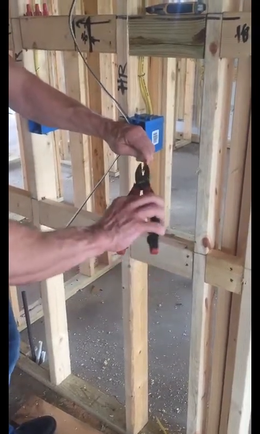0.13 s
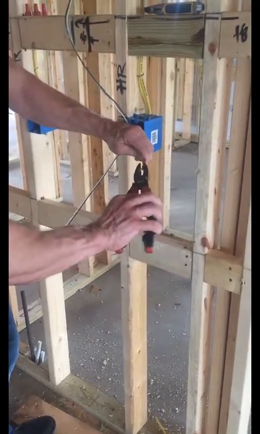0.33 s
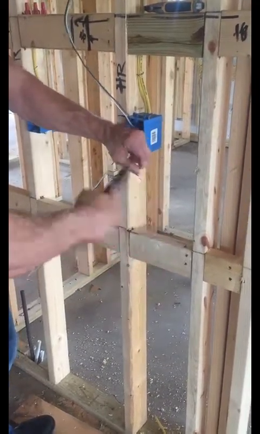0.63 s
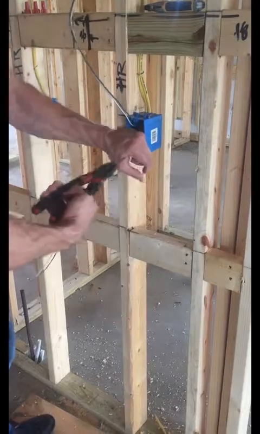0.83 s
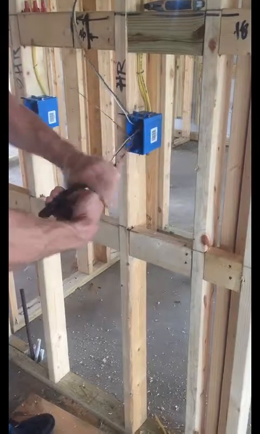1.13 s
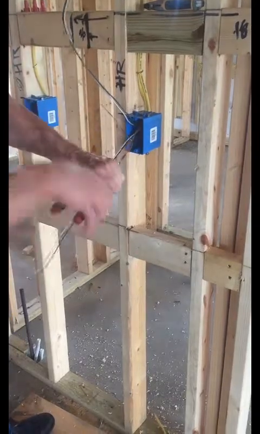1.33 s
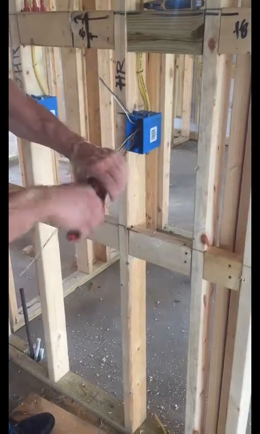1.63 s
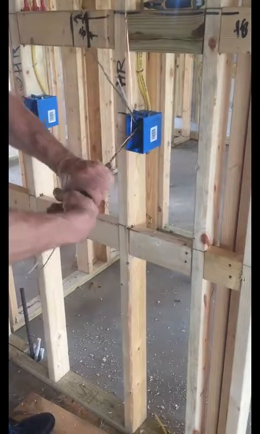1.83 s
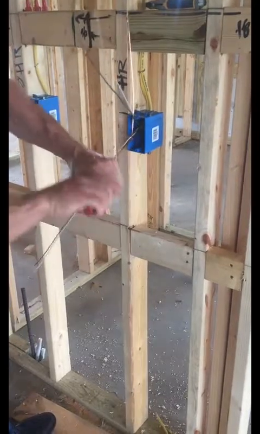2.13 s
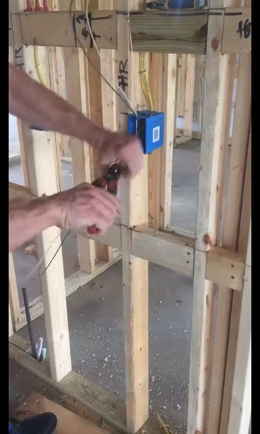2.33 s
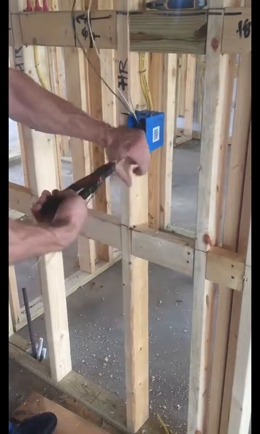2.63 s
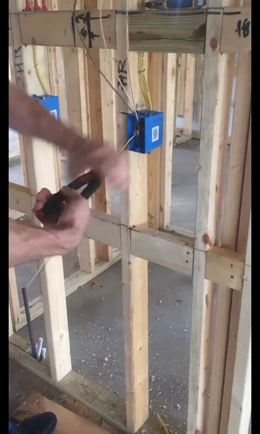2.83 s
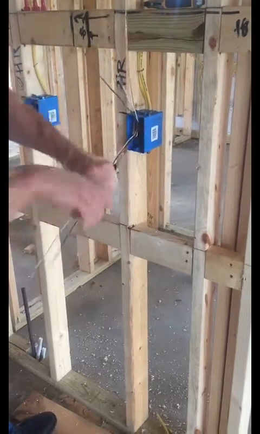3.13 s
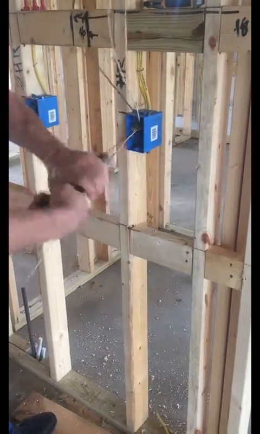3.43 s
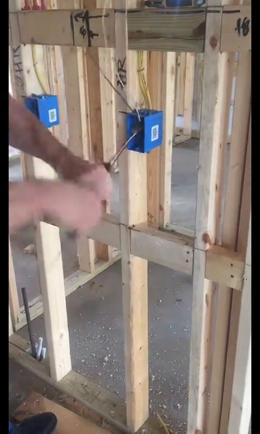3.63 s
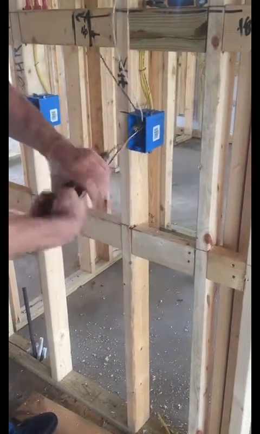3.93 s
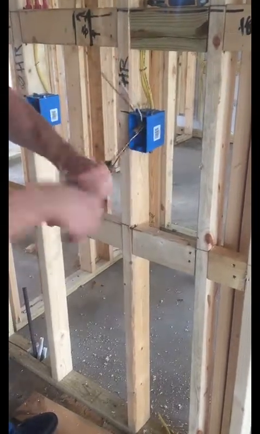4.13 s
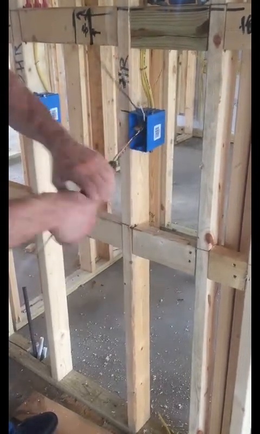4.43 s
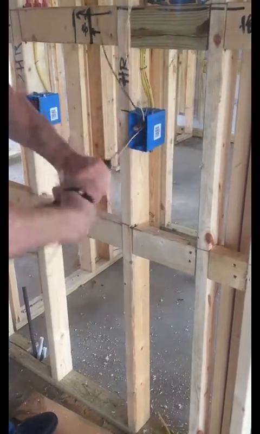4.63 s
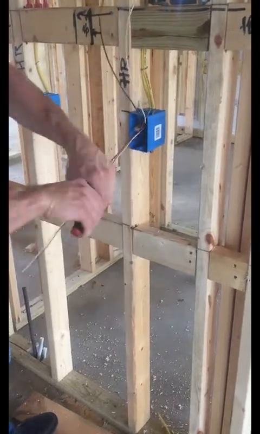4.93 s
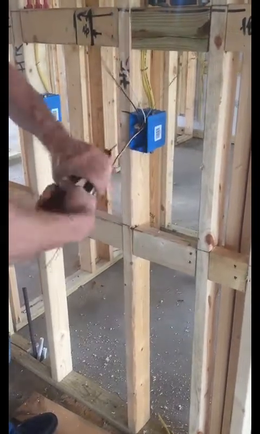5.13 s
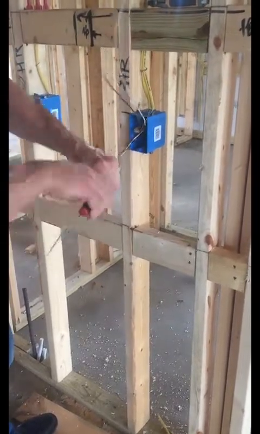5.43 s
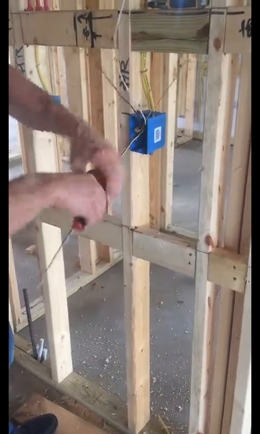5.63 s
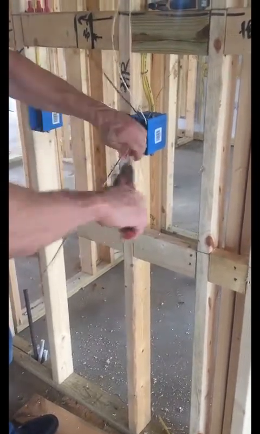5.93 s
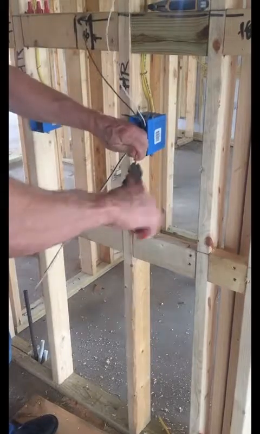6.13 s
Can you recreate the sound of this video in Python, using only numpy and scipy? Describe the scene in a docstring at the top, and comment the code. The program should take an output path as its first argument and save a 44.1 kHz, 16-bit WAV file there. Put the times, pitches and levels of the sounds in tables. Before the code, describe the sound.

Close metalwork in an unfinished wooden building: small clacks of plier jaws, gritty drags along wire, tiny squeaks and ticks, and one sharp twang-like slip after two seconds. Regripping knocks follow unevenly, with a few softer snaps and faint woody jolts from the frame. The last second is mostly quiet hiss, rumble and soft arm movement, picked up by a plain handheld microphone.

```python
"""Pliers twisting copper wires

Pliers twist bare copper wires at a wall box in a timber-framed, unfinished building.
Knocks, snaps and the box are dying tones; scrapes are dense random clicks that also ring the steel.
Wires tick and squeak, and studs, a room tail and a far wall throw sounds back.
Shaped noise makes the jolted framing, rumble, moving arms and a slowly sinking microphone hiss.
"""
import sys
import numpy as np
from scipy import signal
from scipy.fft import rfft, irfft
from scipy.io import wavfile
from scipy.ndimage import uniform_filter1d

SR = 44100
rng = np.random.default_rng(int(sys.argv[2]) if len(sys.argv) > 2 else 0)


def unload_audio(sound):
    """Save the sound as a 16-bit wav file, at the path given as the first command line argument."""
    columns = np.transpose(np.atleast_2d(sound))
    # keep every value between -1 and 1, then stretch to whole-number steps
    steps = np.round(np.clip(columns, -1, 1) * 32767)
    wavfile.write(sys.argv[1], SR, steps.astype(np.int16))


N = 276815  # length in samples

# Levels in the tables come before the trims set in the functions.
# Light knocks of the jaws on the wires:
# (time [s], level [dB], level of the upper modes [dB], favoured lower mode [Hz])
KNOCKS = [(.030, -42.5, -56, 950), (.445, -57.5, -68, 1020), (0.894, -62, -54, 1280),
          (1.238, -53, -57, 1290), (1.339, -43.5, -53, 1290), (1.39, -43, -56, 990),
          (1.454, -47.5, -52, 1010), (1.48, -52, -61, 1010), (1.566, -48, -78, 966),
          (2.099, -43, -52, 1300), (2.136, -44.5, -58, 1010), (2.236, -37, -43.5, 1290),
          (2.3, -48.5, -70, 990), (2.806, -41, -54, 1470), (2.841, -50, -41.5, 1280),
          (3.092, -40, -47, 1290), (3.295, -37.5, -56, 1270), (3.435, -49.5, -50, 1290),
          (3.481, -49, -64, 1290), (3.641, -37.5, -47, 1360), (3.748, -38.5, -44, 1310),
          (4.005, -59, -61, 1030), (4.152, -33.5, -38, 1265), (4.277, -44, -48, 1280),
          (4.604, -45, -55, 1270), (4.699, -39, -47.5, 1290), (5.316, -56.5, -48, 1020),
          (5.343, -48.5, -67, 1290), (5.58, -60, -55, 1400)]
# Ways the hand-damped pliers vibrate, from body to tips: (frequency [Hz], level [dB], time to fall 60 dB [s])
THUD_MODES = [(390.5, 4, 0.22), (661, 7, 0.14)]
JAW_MODES = [(993, -10.5, 0.044), (1011, 2, 0.019), (1152, -11.5, 0.053), (1295, -0.5, 0.024),
             (1483, -16.5, 0.067), (1600, 8, 0.0028)]
TIP_MODES = [(1750, 9.5, 0.0086), (2014, 2.5, 0.014), (2157, 1, 0.02), (2365, 6, 0.013), (2497, 1, 0.016),
             (2670, -3, 0.014), (3275, -2, 0.011)]
# A wire slips past the jaw edge: (time [s], level [dB], ring length factor [-], first favoured mode [Hz],
# its boost [dB], second favoured mode [Hz], its boost [dB], tilt [dB per octave], tick [dB], tug on box [dB])
WIRE_SNAPS = [(2.4742, -23.5, 0.35, 1480, 8.5, 3330, 10.5, 3, -26, -51),
              (3.8216, -43.5, 0.42, 1285, 13, 3330, 14, -2.5, -41, -47),
              (4.3337, -42.5, 0.46, 1260, 6, 1970, 3, -4, -41.5, -52.5),
              (4.8894, -42.5, 0.64, 983, 10.5, 2040, 10, 0, -36, -54)]
# Pliers and taut wire ringing together, before any damping:
# (frequency [Hz], level [dB], time to fall 60 dB [s])
RING_MODES = [(712, -1, .05), (885, -6, .06), (997, 4, .09), (1130, -5, .04), (1285, 5, .055),
              (1385, 7, .1), (1515, 1, .07), (1840, -9, .05), (2012, 3, .07), (2180, -3, .07),
              (2380, 1, .06), (2620, -5, .05), (2765, -3, .14), (3330, -1, .045), (3520, -10, .06),
              (4180, -7, .06), (6250, -16, .025)]
# The wall box and its stud, tugged through the wire: (frequency [Hz], level [dB], time to fall 60 dB [s])
BOX_MODES = [(145, -2, .3), (367, 0, .13), (620, 2, .09)]
# Tone colour of a snap's tick: (frequency [Hz], relative level [dB per Hz])
TICK_COLOUR = [(300, -39), (700, -18), (1300, -32), (3000, 4.5), (4800, -1.5), (6500, -2.5), (9000, -13),
               (15000, -16)]
# The jaws drag along the wire: (time [s], level [dB], fading time [s], ringing relative to the drag [dB])
WIRE_DRAGS = [(.802, -45.5, 0.01, -4.5), (.832, -48.5, 0.0054, -14), (1.026, -61, 0.034, 3),
              (1.056, -46.5, 0.015, -1.5), (1.083, -45.5, 0.025, -3.5), (1.6905, -31, 0.012, -26),
              (1.7276, -30, 0.011, -8), (1.754, -32, 0.019, -11), (1.787, -42, 0.065, -4),
              (1.8125, -29, 0.0043, -2.5), (1.844, -42, 0.054, -5), (1.858, -41.5, 0.012, -0.5),
              (2.837, -60.5, 0.0047, 6), (4.552, -61, 0.0066, 7), (4.867, -59, 0.0093, -6),
              (5.542, -61.5, 0.0084, 5)]
# Tone colour of a drag before its tilt: (frequency [Hz], relative level [dB per Hz])
SCRAPE_COLOUR = [(100, -14), (200, -25.5), (400, -9.5), (780, -10.5), (1020, 5), (1500, -8.5), (2200, 1),
                 (2900, -13.5), (3500, -3.5), (4500, -14.5), (6200, -8.5), (10500, -22), (15500, -27.5)]
# The wire squeaks in the jaws:
# (time [s], length [s], lower tone [Hz], its level [dB], upper tone [Hz], its level [dB])
WIRE_SQUEAKS = [(0.424, 0.04, 1484, -56.5, 2226, -55), (1.648, 0.042, 1644, -56, 1980, -63),
                (2.833, 0.015, 1545, -49, 2200, -42.5), (5.906, 0.02, 1520, -61, 3310, -68)]
# Hard pulls on the wire that jolt the framing: (time [s], level [dB])
JOLTS = [(.81, -53), (1.08, -64), (1.715, -48), (2.48, -59), (3.295, -62), (3.825, -56.5), (4.335, -53.5),
         (4.895, -57.5)]
# Tone colour of the jolted framing: (frequency [Hz], relative level [dB per Hz])
SHUDDER_COLOUR = [(60, -6), (140, 2.5), (220, -4.5), (360, 3), (480, -4.5), (680, -1.5), (900, -10),
                  (2500, -50)]
# Near reflections from the studs: (delay [s], level [dB])
STUD_ECHOES = [(.0031, -14), (.0066, -7), (.0105, -14), (.0142, -18)]
# How long the room rings at each pitch: (frequency [Hz], time to fall 60 dB [s])
ROOM_T60 = [(150, 0.22), (500, 1), (1000, 0.71), (2500, 0.37), (5000, 0.53), (9000, 0.22), (15000, 0.28)]
# Tone colour of the building's rumble: (frequency [Hz], relative level [dB per Hz])
RUMBLE_COLOUR = [(15, -48), (30, -16), (45, -11.5), (57, 11), (70, -0.5), (90, 4), (120, -4), (180, -20),
                 (400, -38)]
# The rumble's changing level: (time [s], level [dB])
RUMBLE_LEVEL = [(0, -62), (2.85, -61), (3.5, -69.5), (4.0, -65.5), (5.27, -68), (5.6, -62), (6.28, -61.5)]
# Dull low bumps as the worker shifts about: (time [s], level [dB])
BUMPS = [(.67, -54), (1.215, -51), (5.47, -54), (5.835, -50), (6.08, -53)]
# Wide swings of the arm: (middle [s], half length [s], level [dB])
ARM_SWINGS = [(2.296, 0.24, -65), (5.823, 0.56, -64.5)]
# Tone colour of moving arms and clothes: (frequency [Hz], relative level [dB per Hz])
SWISH_COLOUR = [(60, 1.5), (130, 4.5), (280, 3), (420, -4), (900, -8), (3000, -98)]
# Microphone hiss with two humps: (frequency [Hz], relative level [dB per Hz])
HISS_COLOUR = [(200, -9.5), (500, -22), (1000, -1.5), (2000, -8.5), (3400, -8), (4400, 7.5), (5100, 7.5),
               (6000, -7), (7600, -10), (8800, 9.5), (9700, 10.5), (10700, -6), (13000, -7.5), (15800, -14)]

TIP_HZ = 2360  # the upper mode that the gripping point favours
MIDDLING_KNOCK_DB = -42.5  # thuds and settling are scaled from a knock this loud


def clacks(jaw_db=-4, tip_db=-5, favour_db=4, detune=0.014, lead_s=0.002, rise_s=0.0024):
    """Each new grip knocks the damped pliers, and the jaws chatter briefly as they seat."""
    thud_db, thud_growth = -66.5, 0.7  # thud under a middling knock, its dB per dB of knock
    chatter_db, chatter_s, chatter_count = -10, 0.012, 3
    out = np.zeros(N)
    for time, db, upper_db, jaw_hz in KNOCKS:
        jaw = favoured(JAW_MODES, jaw_hz, favour_db)
        tip = favoured(TIP_MODES, TIP_HZ, favour_db)
        low_db = thud_db + thud_growth * (db - MIDDLING_KNOCK_DB)
        contacts = [(0.00045, 0.01)]  # delay in seconds, level in dB
        for delay in rng.random(chatter_count) * chatter_s:
            contacts.append((delay, chatter_db))
        parts = [(jaw, db + jaw_db), (tip, upper_db + tip_db), (THUD_MODES, low_db)]
        for modes, level_db in parts:
            # the grip shifts the modes a little
            gripped = np.array(modes) * [1 + detune * rng.standard_normal(), 1, 1]
            knock = peaked(ring(gripped, rise_s, size=6000))
            for delay, contact_db in contacts:
                add(out, time - lead_s + delay, amp(level_db + contact_db) * knock)
    return out


def snaps(rise_s=0.0042, box_rise_s=0.0064, tick_rise_s=0.00032, tick_fade_s=0.0039, size=2048):
    """A slipping wire gives a bright tick, rings the pliers and tugs the box."""
    out = np.zeros(N)
    t = seconds(size)
    tick_shape = np.exp(-t / tick_fade_s) * (1 - np.exp(-t / tick_rise_s))
    for time, db, length, hz_a, boost_a, hz_b, boost_b, tilt_db, tick_db, tug_db in WIRE_SNAPS:
        # the contact point favours two modes
        hz, mode_db, t60 = favoured(favoured(RING_MODES, hz_a, boost_a), hz_b, boost_b).T
        tilted_db = mode_db + tilt_db * np.log2(hz / 1600)
        modes = np.transpose([hz, tilted_db, t60 * length])
        add(out, time, amp(db) * ring(modes, rise_s * length))
        add(out, time, amp(tick_db) * noise(TICK_COLOUR, size) * tick_shape)
        add(out, time, amp(tug_db) * ring(BOX_MODES, box_rise_s))
    return out


def scrapes(slips_per_s=1700, grit_db=10, contact_s=0.00046, box_db=-24, box_rise_s=0.014, size=8192):
    """Dense stick-slip clicks of uneven strength rasp and ring the steel; each stroke also tugs the box."""
    out = np.zeros(N)
    t, hz = seconds(size), np.fft.rfftfreq(size, 1 / SR)
    for time, db, rise, fade, tilt_db, ring_db in strokes():
        slips = (rng.random(size) < slips_per_s / SR) * np.sign(rng.standard_normal(size))
        slips = slips * amp(grit_db * rng.random(size))
        slips = slips * np.exp(-t / fade) * (1 - np.exp(-t / rise))
        colour_db = read(SCRAPE_COLOUR, hz) + tilt_db * np.log2(np.maximum(hz, 800) / 2000)
        log_gain = np.log(amp(colour_db))
        # a causal filter: each slip sounds only after it happens
        mirrored = np.r_[log_gain, log_gain[-2:0:-1]]
        colour = np.exp(np.conj(signal.hilbert(mirrored)))[:len(hz)]
        rasp = peaked(irfft(rfft(slips) * colour))
        # the sliding grip raises the steel's pitch a little and shortens its ring
        sliding = np.array(RING_MODES) * [1 + 0.041 * rng.random(), 1, 0.87]
        ringing = peaked(signal.fftconvolve(slips, ring(sliding, contact_s)))
        add(out, time, amp(db) * rasp)
        add(out, time, amp(db + ring_db) * ringing)
        add(out, time, amp(db + box_db) * peaked(ring(BOX_MODES, box_rise_s)))
    return out


def strokes(firm_db=-34, tilt_per_db=0.5):
    """Lists drags, brighter when firmer and slower to build when longer, and the slide into each snap."""
    # each stroke: (time [s], level [dB], build-up [s], fading [s], tilt [dB per octave], ringing [dB])
    listed = []
    for time, db, fade, ring_db in WIRE_DRAGS:
        build = 0.0005 * (fade / 0.0059) ** 0.56
        listed.append((time, db, build, fade, tilt_per_db * (db - firm_db), ring_db))
    for time, *_ in WIRE_SNAPS:
        listed.append((time - 0.006, -50, 0.0027, 0.0045, 4, 2))
    return listed


def chafing(tip_db=-6, ticks_per_s=220, spread_db=4, rise_s=0.00053, steady_db=-82):
    """Tiny uneven slips between the wires tick faintly in the pliers, swelling after a knock or snap."""
    settle_db, settle_growth = -65, 1  # settling after a middling knock, its dB per dB of knock
    strength = amp(spread_db * np.minimum(rng.exponential(1, N), 3))
    ticks = (rng.random(N) < ticks_per_s / SR) * strength
    body = peaked(ring(JAW_MODES, rise_s)) + amp(tip_db) * peaked(ring(TIP_MODES, rise_s))
    upsets = [(time, settle_db + settle_growth * (db - MIDDLING_KNOCK_DB))
              for time, db, *_ in KNOCKS + WIRE_SNAPS]
    settling = aftermath(upsets, rise=0.04, fade=0.06)
    return evened(signal.oaconvolve(ticks, body)[:N]) * np.hypot(amp(steady_db), settling)


def squeaks(waver=0.034, smoothing=90):
    """Copper sliding under pressure sings softly on two tones that waver together."""
    out = np.zeros(N)
    for time, length, low_hz, low_db, high_hz, high_db in WIRE_SQUEAKS:
        swell = np.hanning(round(length * SR))
        wander = evened(uniform_filter1d(rng.standard_normal(4096), smoothing))
        drift = 1 + waver * wander[:len(swell)]
        for hz, db in (low_hz, low_db), (high_hz, high_db):
            phase = 2 * np.pi * np.cumsum(hz * drift) / SR
            add(out, time, amp(db) * swell * np.sin(phase))
    return out


def shudder(knock_db=2, boom_db=2):
    """The jolted framing gives a short woody shudder and a low boom that swells more slowly."""
    woody = noise(SHUDDER_COLOUR) * aftermath(JOLTS, rise=0.008, fade=0.05)
    boom = noise(RUMBLE_COLOUR) * aftermath(JOLTS, rise=0.05, fade=0.09)
    return amp(knock_db) * woody + amp(boom_db) * boom


def studs(x):
    """The framing close by returns a few quick reflections, added to the direct sound."""
    out = x.copy()
    for delay, db in STUD_ECHOES:
        add(out, delay, amp(db) * x)
    return out


def room(x, tail_db=-10, early_db=4, early_fade_s=0.025, build_s=0.0024):
    """Scatter from the framing, a spread echo from the far wall and a tail that dies by band."""
    wall_db, wall_s, wall_width_s = -1, 0.092, 0.016
    hz, t, bands = signal.stft(rng.standard_normal(SR), SR, nperseg=256)
    dying = bands * amp(-60 * t / read(ROOM_T60, hz)[:, None])
    tail = signal.istft(dying, SR, nperseg=256)[1][:SR]
    t = seconds(len(tail))
    # scale by the energy of the decay at 1140 Hz
    tail = tail / np.sqrt(np.sum(amp(-60 * t / read(ROOM_T60, 1140)) ** 2))
    early = amp(early_db) * np.exp(-t / early_fade_s)
    wall = amp(wall_db) * np.exp(-((t - wall_s) / wall_width_s) ** 2)
    shape = (1 + early + wall) * np.minimum(t / build_s, 1)
    return amp(tail_db) * signal.fftconvolve(x, tail * shape)[:N]


def background(bump_db=4, swish_db=-69.5, hiss_start_db=-57, hiss_end_db=-59.5):
    """Shaped noises give building rumble with a few bumps, moving arms, and a hiss that slowly sinks."""
    t = seconds(N)
    bumps = amp(bump_db) * aftermath(BUMPS, rise=0.01, fade=0.027)
    rumble_level = amp(np.interp(t, *np.transpose(RUMBLE_LEVEL)))
    rumble = noise(RUMBLE_COLOUR) * np.hypot(rumble_level, bumps)
    swings = sum(amp(db) * np.exp(-((t - middle) / half) ** 2) for middle, half, db in ARM_SWINGS)
    swish = noise(SWISH_COLOUR) * np.hypot(amp(swish_db), swings)
    hiss_db = hiss_start_db + (hiss_end_db - hiss_start_db) * t / t[-1]
    hiss = noise(HISS_COLOUR) * amp(hiss_db)
    return rumble + swish + hiss


def ring(modes, rise, size=12000):
    """Dying tones, set going by a contact that lasts about `rise` seconds."""
    t = seconds(size)
    hz, db, t60 = np.transpose(modes)[:, :, None]
    phase = rng.random(hz.shape)
    tones = amp(db - 60 * t / t60) * np.sin(2 * np.pi * (hz * t + phase))
    return tones.sum(0) * (1 - np.exp(-(t / rise) ** 2))


def favoured(modes, hz, boost_db, focus=0.043):
    """The contact point drives the modes near hz harder than the rest."""
    f, db, t60 = np.transpose(modes)
    nearness = np.exp(-(np.log(f / hz) / focus) ** 2)
    return np.transpose([f, db + boost_db * nearness, t60])


def aftermath(events, rise, fade):
    """A level that swells and dies away after each (time [s], level [dB]) event; powers add."""
    power = np.zeros(N)
    t = seconds(SR)
    for time, db in events:
        add(power, time, (amp(db) * (1 - np.exp(-t / rise)) * np.exp(-t / fade)) ** 2)
    return np.sqrt(power)


def noise(points, size=N):
    """Noise of a given tone colour, rms 1."""
    spectrum = rfft(rng.standard_normal(size))
    gain = amp(read(points, np.fft.rfftfreq(size, 1 / SR)))
    return evened(irfft(spectrum * gain, size))


def read(points, hz):
    """Reads a table between its points on a log-frequency axis."""
    f, value = np.transpose(points)
    return np.interp(np.log(hz + 1), np.log(f + 1), value)


def amp(db):
    """Decibels to gain."""
    return 10 ** (np.asarray(db) / 20)


def evened(x):
    """Scales to rms 1."""
    return x / np.sqrt(np.mean(x ** 2) + 1e-20)


def peaked(x, size=176):
    """Scales the loudest few milliseconds (`size` samples) to rms 1."""
    return x / np.sqrt(uniform_filter1d(x ** 2, size).max() + 1e-20)


def add(mix, time, sound):
    """Mixes a sound in at a time in seconds, cut off at the end of the mix."""
    part = mix[max(round(time * SR), 0):][:len(sound)]
    part += sound[:len(part)]


def seconds(size):
    """Time axis in seconds."""
    return np.arange(size) / SR


def scene(clack_room_db=1, snap_room_db=3.0, scrape_room_db=-1):
    """The pliers at arm's length in the open framing, direct and thrown back, over the background."""
    knocks = clacks() + chafing() + squeaks()
    rings = snaps()
    drags = scrapes()
    to_room = amp(clack_room_db) * knocks + amp(snap_room_db) * rings + amp(scrape_room_db) * drags
    mix = studs(knocks + rings) + drags + room(to_room) + shudder() + background()
    return mix[None]


def record(dry, edge_hz=15950):
    """The recorder's band limit: a steep filter removes the highest treble."""
    low_pass = signal.firwin(511, edge_hz, window=("kaiser", 9), fs=SR)
    return signal.oaconvolve(dry, low_pass[None], "same")


dry = scene()
out = record(dry)
unload_audio(out)
```